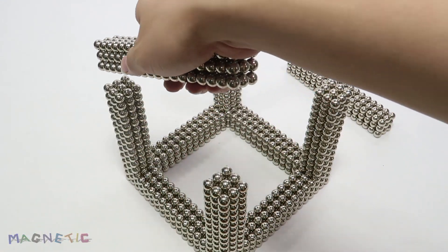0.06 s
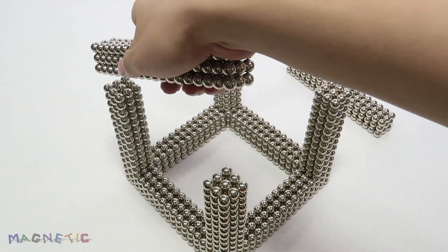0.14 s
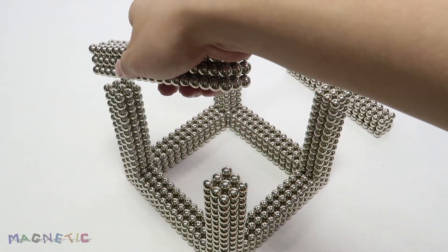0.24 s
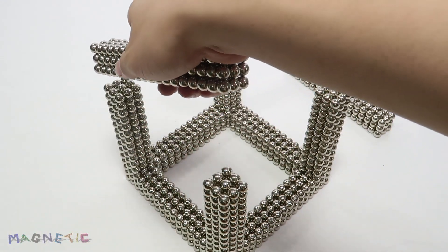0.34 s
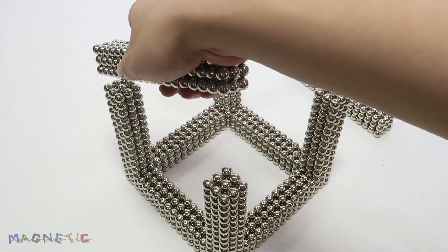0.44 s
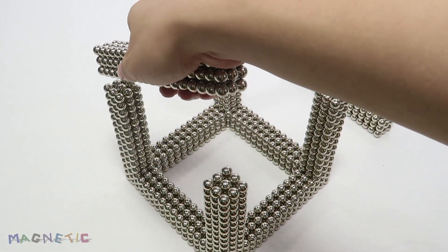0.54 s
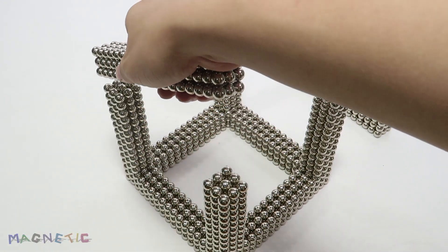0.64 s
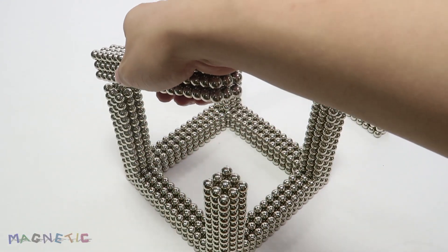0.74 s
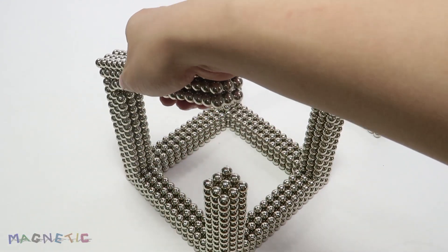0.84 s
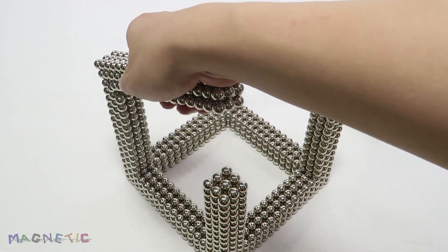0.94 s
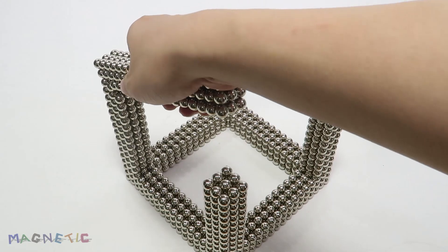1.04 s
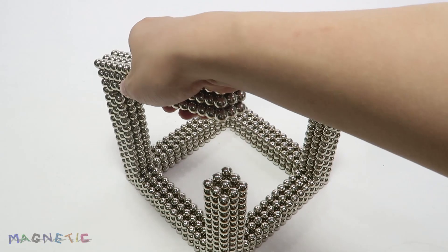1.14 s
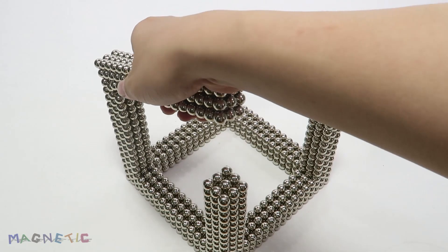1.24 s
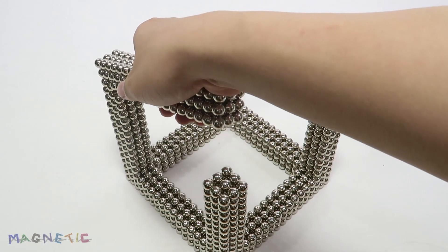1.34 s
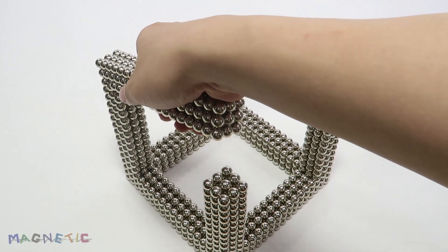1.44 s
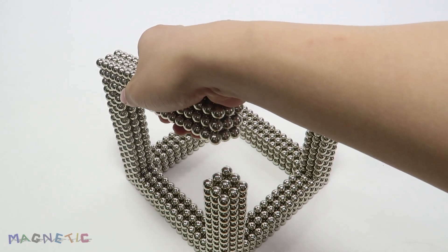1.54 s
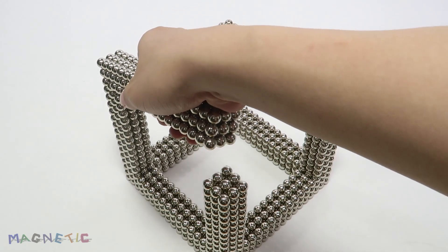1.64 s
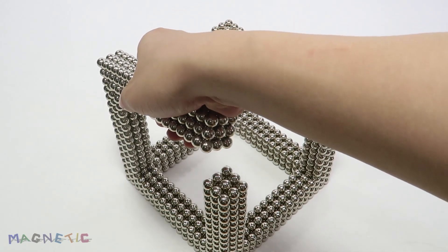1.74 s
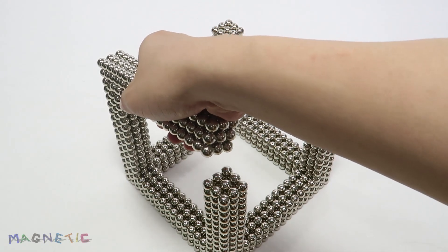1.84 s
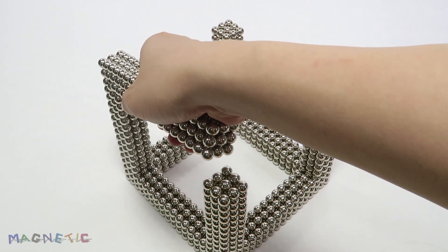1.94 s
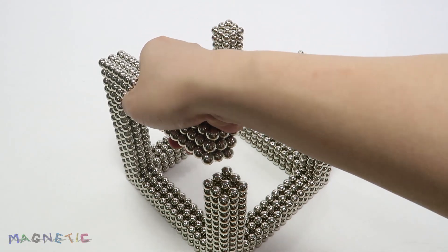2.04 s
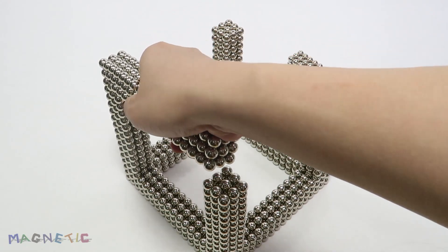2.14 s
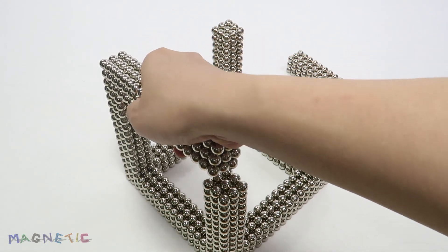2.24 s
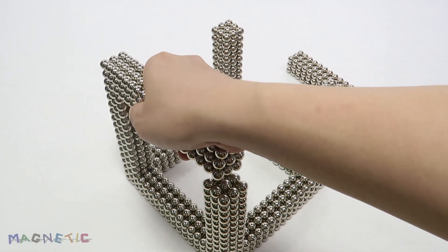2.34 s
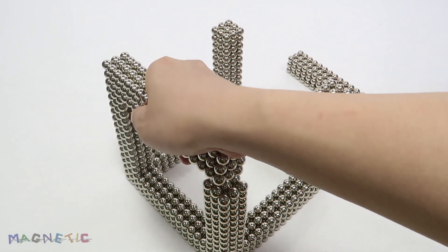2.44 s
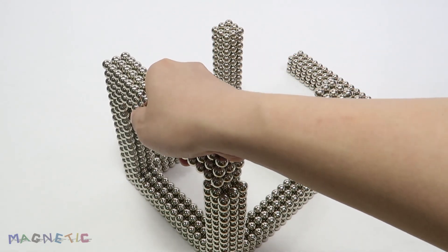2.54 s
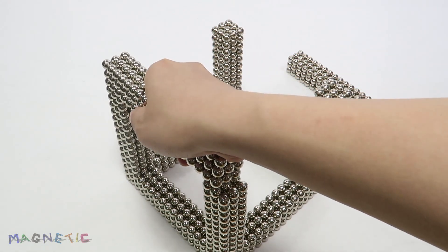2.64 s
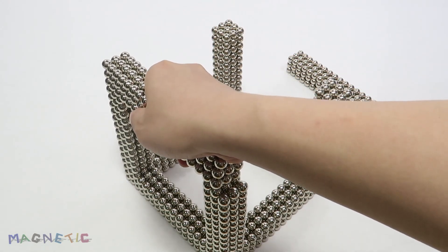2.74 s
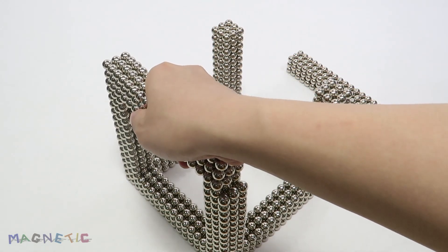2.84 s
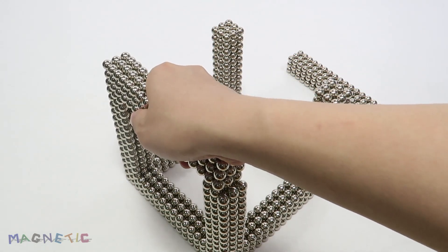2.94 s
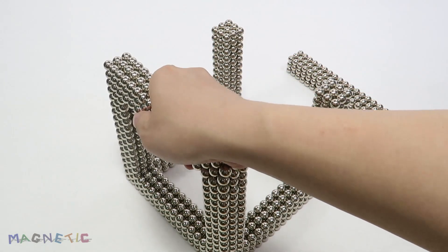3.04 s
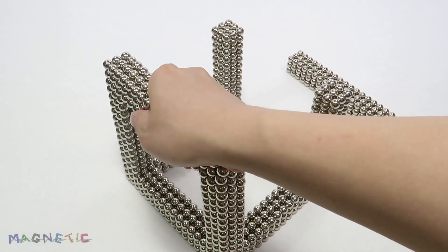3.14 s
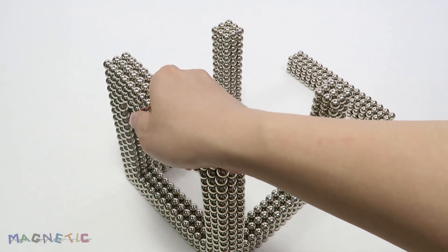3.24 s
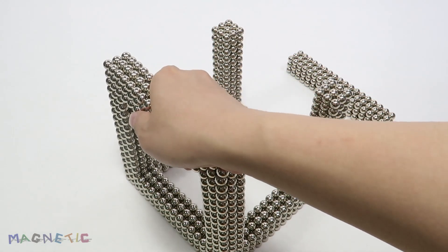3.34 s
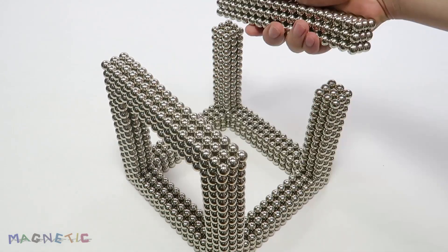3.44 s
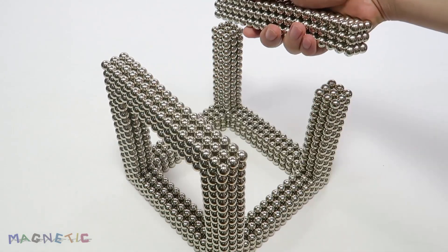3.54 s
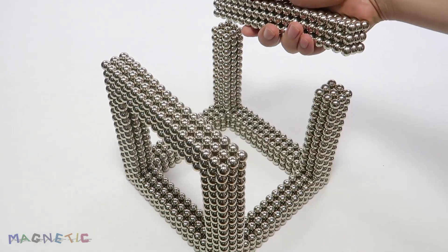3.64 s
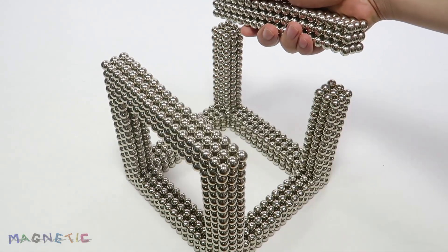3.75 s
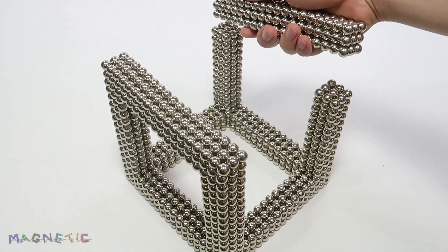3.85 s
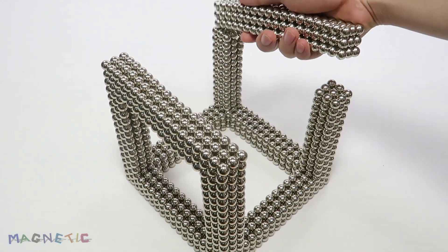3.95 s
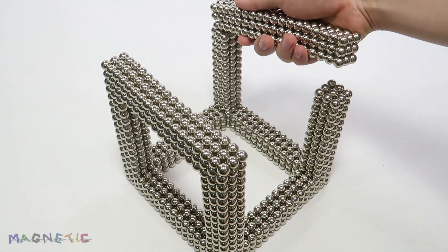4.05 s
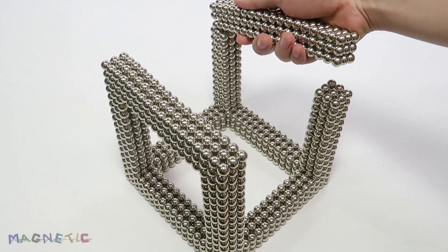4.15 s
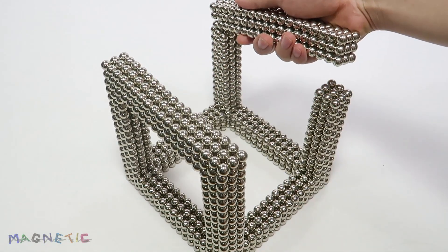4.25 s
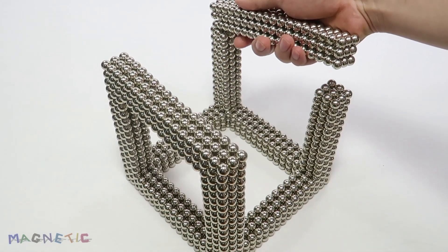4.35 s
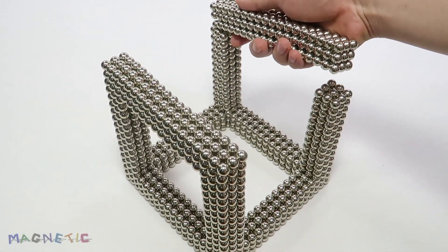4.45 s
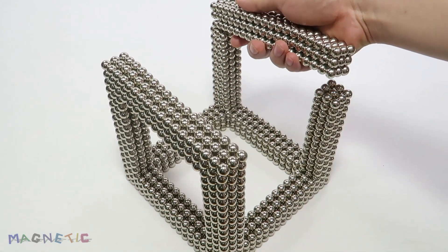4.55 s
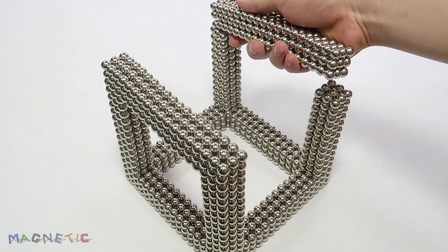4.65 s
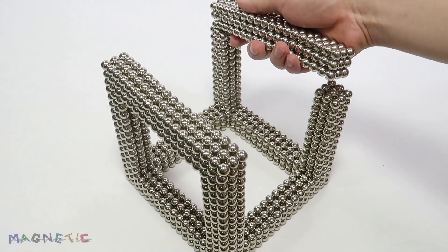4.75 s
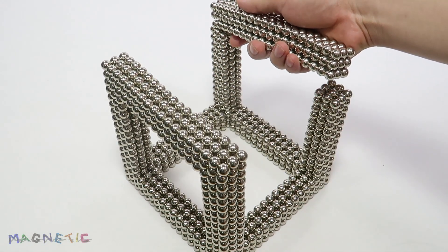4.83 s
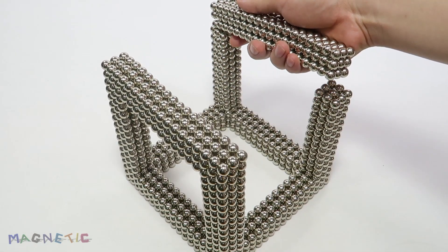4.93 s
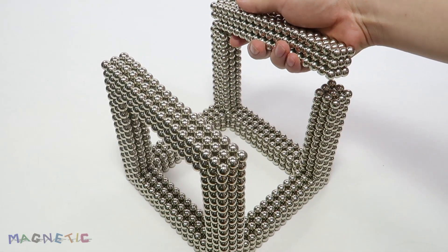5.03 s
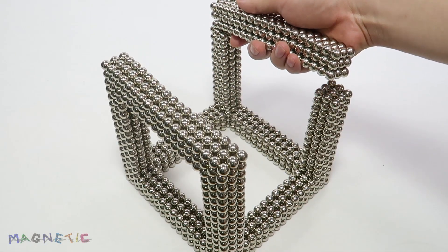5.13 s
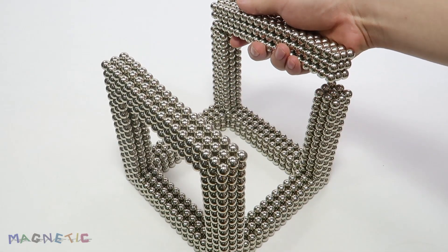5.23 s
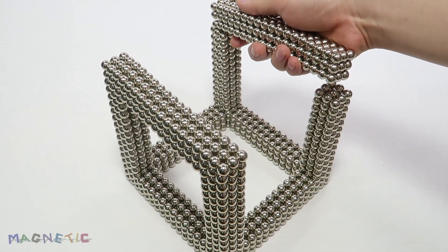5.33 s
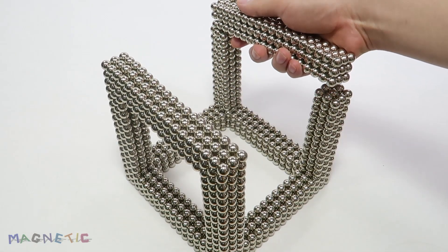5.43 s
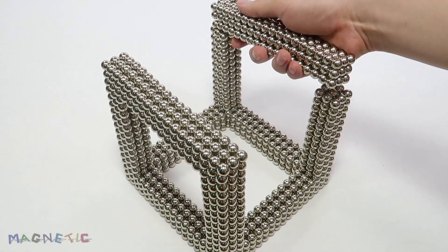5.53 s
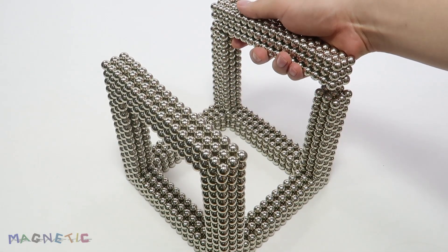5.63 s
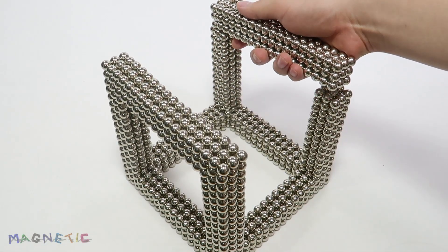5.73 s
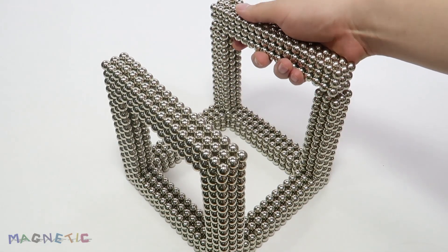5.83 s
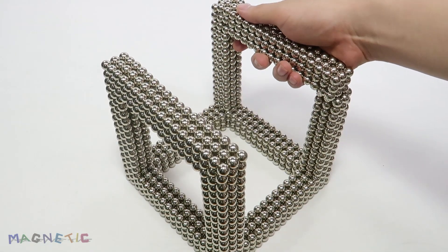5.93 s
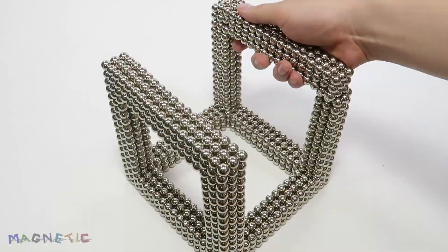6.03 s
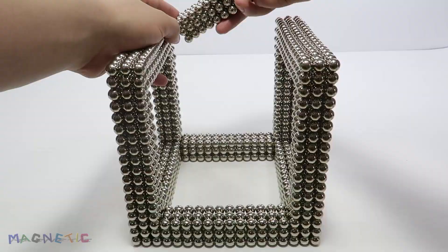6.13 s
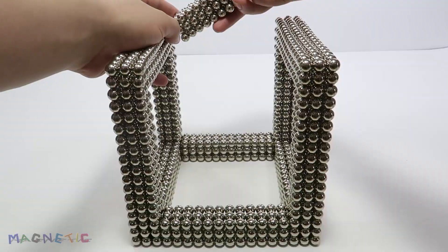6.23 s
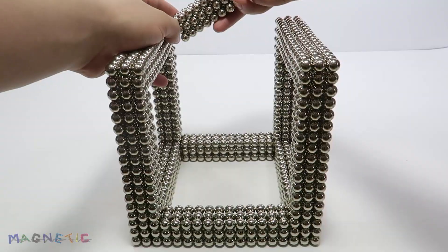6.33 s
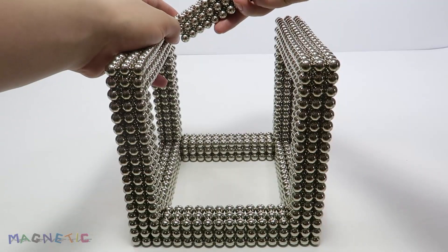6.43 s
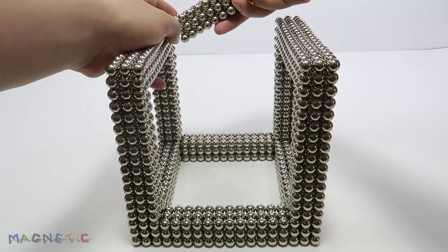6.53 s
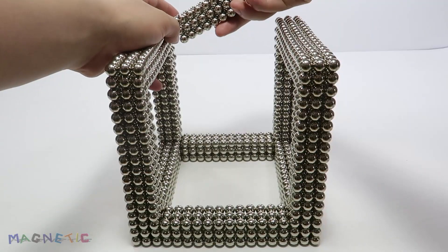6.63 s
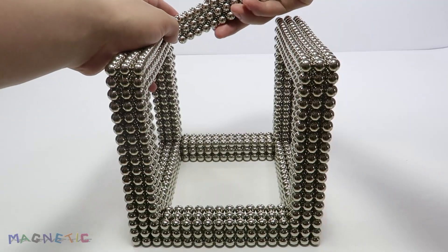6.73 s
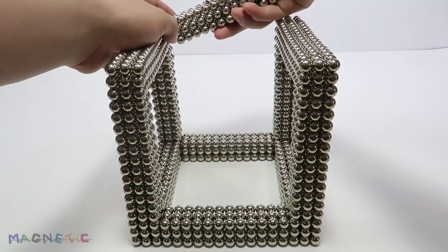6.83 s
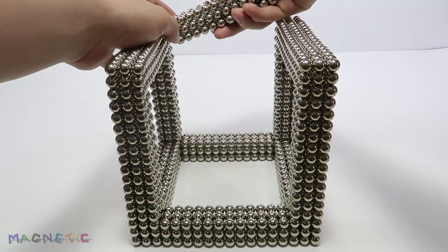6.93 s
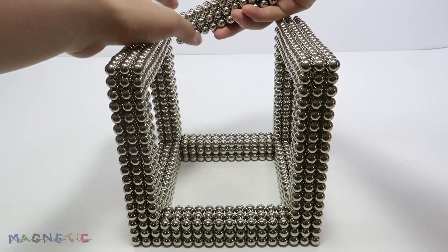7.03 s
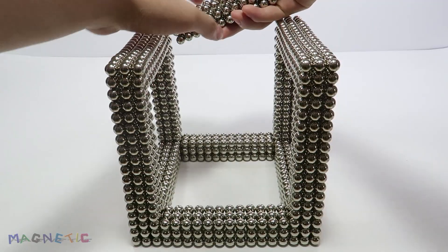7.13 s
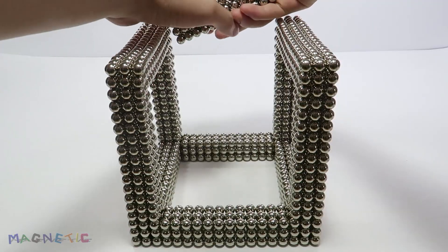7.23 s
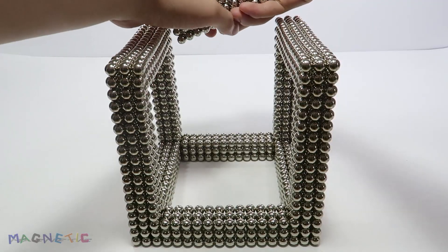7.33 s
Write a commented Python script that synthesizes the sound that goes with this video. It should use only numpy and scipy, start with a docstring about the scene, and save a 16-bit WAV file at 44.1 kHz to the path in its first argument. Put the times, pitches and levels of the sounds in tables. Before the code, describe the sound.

Very close to the microphone in a bare, ringing room, rails of small magnetic steel balls clack onto a frame. One hard double snap, then light ticks and another cluster, a burst of several snaps, later one more ragged burst, and two softer clicks over dull hiss. Near-silence lies between, with faint hand nudges.

```python
"""Faint wavering low drones and a few dull nudges come first, then rows of magnetic balls snap onto a cube frame.
Each joint zips shut in one to five snaps of differing strength and colour, close to the microphone in a bare,
ringing room; each snap is a shaped noise burst.
A landing rail is a swaying tone, a knock of frame resonances and a slow shake of the desk.
Three shots are cut together, the last with open hiss; the loudest snaps overload the microphone."""
import sys
import numpy as np
from scipy import signal
from scipy.fft import rfft, irfft, next_fast_len
from scipy.io import wavfile

SR = 44100
rng = np.random.default_rng(int(sys.argv[2]) if len(sys.argv) > 2 else 0)


def persist_wave(psi):
    """Save psi, clipped to +-1, as 16-bit WAV."""
    counts = np.round(np.clip(psi, -1, 1) * 32767).astype(np.int16)
    wavfile.write(sys.argv[1], SR, np.atleast_2d(counts).T)


N = 325492

# Faint low drones in narrow bands: f/Hz, width/Hz, level/dB before the swell
DRONES = [(114, 19, -79.5), (155, 21, -75), (195, 79, -74.5), (288, 35, -81), (350, 13, -89.5),
          (446, 39, -83), (683, 45, -92), (1060, 70, -94.5), (1470, 90, -96.5)]
# Faint steady air noise, relative spectrum: f/Hz, density/dB per Hz
AIR_SPECTRUM = [(25, -18.5), (90, -1), (300, -3), (700, -16.5), (2500, -23.5), (4500, -26.5), (7500, -17.5),
                (12000, -11), (16000, -30)]
AIR_DB = -83.5
# Open hiss of the last shot, relative spectrum: f/Hz, density/dB per Hz
HISS_SPECTRUM = [(15, -50), (25, -9), (91, -11), (152, 2), (204, -11), (289, -2), (349, -14.5), (469, -10),
                 (684, -16.5), (762, -19), (5730, -37.5), (11800, -50), (15500, -60)]
HISS_DB = -44
# A rail that sings on faintly after landing: t/s, f/Hz, level/dB before it wavers, t60/s
SINGING_RAIL = (4.159, 2191, -43.5, 1.15)
# Final rate of decay of the room's ring: f/Hz, t60/s
ROOM_T60 = [(60, 1.15), (300, 0.6364), (1200, 0.6582), (5000, 0.6283), (9000, 0.5), (15000, 0.1659)]
# Colour of the room's ring: f/Hz, level/dB
ROOM_COLOUR = [(40, 0.5), (150, 4.5), (400, 6), (1200, 9), (3000, 2.5), (6500, 0), (11000, -2.5),
               (16000, -2)]
# Slow modes of the desk: f/Hz, relative level/dB, t60/s of the final decay
DESK_MODES = [(30, 1, 0.78), (85, -12.5, 0.13)]
# Resonances of the frame: f/Hz, width/Hz, relative level/dB
FRAME_MODES = [(300, 88, 4), (403, 93, 5.5), (548, 67, -6.5), (619.7, 24, -1.5), (818, 46, 0.5),
               (974, 55, -1), (1010, 94, -7), (1220, 65, -10.5), (1504, 120, -7), (1840, 50, 1.5)]
# Nudges by the hand, a sway with hardly a knock: t/s, sway f/Hz, sway level/dB
NUDGES = [(.03, 154, -27.5), (.195, 135, -31.5), (.485, 120, -38.5), (2.06, 145, -34.5), (5.415, 221, -26),
          (5.56, 135, -32.5)]
# Rails landing on the frame: t/s, sway f/Hz, share by which the sway starts higher, sway level/dB,
# knock centre f/Hz, knock level/dB, room level/dB against the blow
THUDS = [(1.0305, 65.7, 0.087, 8.5, 760, 9, -6.5), (1.036, 253, 0.13, -8, 318, 1.5, -1.5),
         (2.61, 153, 0.038, -5.5, 760, -24.5, -7), (2.647, 85, 0.11, -5, 473, -23.5, -7.5),
         (3.192, 151, 0.15, 0, 522.4, 7.5, -1.5), (3.195, 72, 0.094, 0.5, 1030, 4, -3),
         (3.442, 123, 0.24, -1, 468, -12, -4), (4.054, 144, 0.07, -16.5, 569, -24.5, 5),
         (4.131, 72.6, 0.092, -7, 1180, 2.5, -4), (4.159, 104.8, .1, 9, 1008, -5, -13.5),
         (5.876, 121, 0.16, 2.5, 800, -25.5, -14.5), (5.879, 220, 0.14, -7.5, 1800, -16, -9.5),
         (6.041, 71.6, 0.84, 2.5, 810, -3.5, -2), (6.27, 191, 0.08, -11, 358, -12, -6.5),
         (6.474, 150.7, 0.074, -8, 336, -19, -1.5)]
# Click of steel on steel: f/Hz, relative level/dB
CLICK = [(100, -9), (450, -18.5), (600, -17), (800, -18.5), (1130, -20.5), (1400, -15.5), (1800, -15),
         (2300, -17.5), (2830, -14.5), (3150, -10), (3850, -9), (4500, -2.5), (5200, -2), (6400, -1),
         (7700, -2), (10500, 1.5), (12500, -0.5), (16000, -5)]
# Dips in the spectrum of the snaps, deepest in the light ones: f/Hz, width/Hz, share of the snap's dip depth
DIPS = [(342, 60, .35), (610, 41, 0.45), (1110, 120, 0.88), (2136, 140, 1.3), (2583, 160, 1.25),
        (3850, 150, 0.27)]
# Rows of balls snapping home: t/s, level/dB, run of contacts/ms, ring f/Hz, ring level/dB, body level/dB,
# dip depth/dB (none from 0 up), treble tilt/dB per octave, room level/dB against the snap
SNAPS = [(1.0285, 26.5, 1.1, 6250, 8, 1.5, -8, -1, -11),
         (1.032, 21, 1.36, 6460, 8.5, -6.5, -6, -1.5, -10.5), (1.0342, 26, 3.5, 10030, 3, -4, -2, 0.5, -7),
         (2.595, -4, .3, 6280, 4, 9.5, -30, -4.5, 2), (2.6089, 0, 0.82, 3290, 12.5, 1.5, -25, -0.5, 0.5),
         (2.6125, -2.5, 2, 6120, 4, 1.5, -24, 4.5, 3), (2.646, 14, 0.96, 6430, 15.5, 2.5, -27, 0.5, -12),
         (3.1697, 15, 1.9, 12100, 1.5, -2, -1, -2.5, -6), (3.1895, 21.5, 2.8, 11180, 4.5, -11, -3, 2, -7),
         (3.1924, 20, 2.16, 4375, 2, -4, 0, 0, -7), (3.1953, 19.5, 3.5, 1900, 4.5, -2, -5, 1.5, -6.5),
         (3.4408, 6, 3, 1860, 16.5, 4.5, -14, -1.5, -11.5),
         (3.4427, 3.5, 1.8, 6130, 4, 9, -11.5, -7.5, -13),
         (4.0499, 6.5, 0.51, 10300, 5.5, -14.5, -17, 4, -14.5),
         (4.052, -2.5, 0.6, 6450, 9, -9, -18, 1.5, -6.5), (4.1299, 21, 3.46, 4570, 0, 3, -2, 3.5, -2.5),
         (4.1491, 18, 2.7, 3016, 11, 6.5, -9, 1.5, -4), (4.1582, 22, 2.1, 12600, 10, 3, -8.5, 4, -7),
         (4.1687, 20, 3.2, 4540, 7.5, 6, -8, 0, -11), (5.8743, 16.5, 0.87, 3270, 10.5, -0.5, -27.5, 2, -14),
         (6.0401, 18, 1.8, 4490, 4.5, 1.5, -11.5, 0.5, -18), (6.0495, 21.5, 4.6, 6200, 5, -2, -17, 3, -8.5),
         (6.0579, 12.5, 1.3, 11100, 10.5, 3, -6, 0, -8.5),
         (6.0633, 17.5, 0.55, 8500, 4, 5.5, -0.5, 2.5, -6),
         (6.0669, 6.5, 0.51, 6180, 2.5, -5.5, 4, -3, -4.5), (6.2705, 8.5, 1.25, 5000, 5, 6.5, 3, 0, -10),
         (6.2896, -5, 1.4, 4060, 9, 12, -12, -4, -22), (6.4744, 8.5, 1.5, 3850, 6.5, 7.5, 6, -2, -11.5)]
# Shots, each with its own rail: end t/s, high ring f/Hz, desk level/dB against the sway,
# level/dB to which the shot's ring is turned down after the cut
SHOTS = [(3.504, 11490, -31.5, -8), (6.201, 11170, -54.5, -36), (7.4, 12500, -56, 0)]

ROOM_SIZE = 65536  # samples of room ring
AFTERHISS_DB, AFTERHISS_GROWTH = -55, 0.16  # dB at a 0 dB snap, and dB gained per dB of snap
NUDGE_STIFFEN = .1  # share by which a nudged sway starts higher
NUDGE_KNOCK_HZ, NUDGE_KNOCK_DB = 390, -23  # the knock is relative to the sway
DESK_FOLLOWS_HZ = 70.6  # faster sways shake the desk less, slower ones more
CLIP_DB = -0.77  # level at which the microphone overloads
LOW_CUT_HZ, TOP_HZ = 12, 15800


def undb(db):
    """Decibels to gain."""
    return 10 ** (np.asarray(db) / 20)


def unit(x):
    """Scale to unit energy per channel, averaged over the channels."""
    return x / np.sqrt(np.sum(np.atleast_2d(x) ** 2, axis=1).mean())


def along(points, hz):
    """Read (Hz, value) points on a log-frequency axis."""
    f, value = np.transpose(points)
    return np.interp(np.log(hz + 1), np.log(f), value)


def bins(size):
    """Frequencies of a spectrum of this many samples."""
    return np.arange(size // 2 + 1) * SR / size


def tint(x, db):
    """Minimum-phase filter with the given gain in each bin, so the colour follows the attack."""
    size = x.shape[-1]
    cepstrum = irfft(np.log(undb(db)), size)
    # folding the cepstrum forward makes the filter causal
    cepstrum[1:size // 2] *= 2
    cepstrum[size // 2 + 1:] = 0
    return irfft(rfft(x) * np.exp(rfft(cepstrum)), size)


def stereo(mid, side, width):
    """Left and right from mid and side."""
    return np.array([mid + width * side, mid - width * side]) / np.hypot(1, width)


def stereo_noise(size, width):
    """White noise spread between left and right."""
    return stereo(*rng.standard_normal((2, size)), width)


def add(track, s, sound):
    """Mix a sound in at time s."""
    start = int(s * SR)
    track[:, start:start + sound.shape[1]] += sound[:, :N - start]


def die_away(age, t60):
    """Exponential decay that loses 60 dB in t60 seconds."""
    return np.exp(-np.log(1000) * age / t60)


def lingering(t, linger_s):
    """Age that starts slowly, so that a decay lingers before it falls."""
    return np.hypot(t, linger_s) - linger_s


def waver(rate=11):
    """Random levels, `rate` a second, joined by straight lines; spread near 1."""
    t = np.arange(N) / SR
    return 1.2 * np.interp(t * rate, np.arange(256), rng.standard_normal(256))


def drones(swell_db=7, wander=0.018):
    """Faint low drones: narrow bands of noise, each swelling, fading and wandering in pitch on its own."""
    size, out = next_fast_len(N, True), 0
    noise = rfft(stereo_noise(size, width=0.72))
    for hz, width_hz, db in DRONES:
        band = irfft(noise * np.exp(-2 * ((bins(size) - hz) / width_hz) ** 2), size)
        # an uneven reading speed bends the pitch
        place = np.cumsum(1 + wander * waver(rate=5.4))
        band = np.array([np.interp(place, np.arange(size), side) for side in band])
        out = out + unit(band) * np.sqrt(N) * undb(db + swell_db * waver(rate=16))
    return out


def air(spectrum, db, width):
    """Steady background noise, shaped by a spectrum and set to an RMS level."""
    size = next_fast_len(N, True)
    shaped = rfft(stereo_noise(size, width)) * undb(along(spectrum, bins(size)))
    noise = irfft(shaped, size)[:, :N]
    return unit(noise) * np.sqrt(N) * undb(db)


def afterhiss(above_hz=4800, t60=4.8, end_s=0.87, order=2):
    """A faint, even hiss outlasts the ring of the latest snap, then stops."""
    t, level = np.arange(N) / SR, np.zeros(N)
    for s, snap_db, *_ in SNAPS:
        age = np.maximum(t - s, 0)
        start_gain = undb(AFTERHISS_DB + AFTERHISS_GROWTH * snap_db)
        stop = np.exp(-(age / end_s) ** 10)
        # the strongest hiss hides the others
        level = np.maximum(level, (t >= s) * start_gain * die_away(age, t60) * stop)
    treble = signal.butter(order, above_hz, "high", fs=SR, output="sos")
    hiss = signal.sosfilt(treble, stereo_noise(N, width=0.49))
    return level * signal.sosfilt(treble, hiss)


def singing_rail(waver_db=3):
    """One thin tone that wavers in level and phase as it fades."""
    s, hz, db, t60 = SINGING_RAIL
    age = np.maximum(np.arange(N) / SR - s, 0)
    level = (age > 0) * undb(db + waver_db * waver(rate=7.7))
    tone = np.sin(2 * np.pi * hz * age + waver())
    return level * tone * die_away(age, t60)


def room_modes(hz, spread_db=5, spacing_hz=28, merge_hz=8000):
    """Gain per bin of the room's own modes: separate lines low down, merging higher up."""
    peaks = np.interp(hz / spacing_hz, np.arange(2048), rng.uniform(-1.7, 1.1, 2048))
    return spread_db * peaks / np.hypot(1, hz / merge_hz)


def room(build_s=0.00077, linger_s=0.16, bands=10):
    """Diffuse field of bare walls in bands, and how each dies away: it lingers, then falls."""
    size = 2 * ROOM_SIZE
    t, hz = np.arange(ROOM_SIZE) / SR, bins(size)
    noise = rfft(stereo_noise(size, width=0.55)) * undb(along(ROOM_COLOUR, hz) + room_modes(hz))
    centres = np.geomspace(100, 15000, bands)
    # each band fades linearly into its neighbours
    field = np.array([irfft(noise * along(np.c_[centres, share], hz), size) for share in np.eye(bands)])
    fall = die_away(lingering(t, linger_s), along(ROOM_T60, centres)[:, None])
    return field, fall * (1 - np.exp(-t / build_s))


def echoes(walls):
    """Every blow meets its own pattern of reflections: a random stretch of the diffuse field."""
    field, decay = walls
    start = rng.integers(ROOM_SIZE)
    return unit(np.einsum("bct,bt->ct", field[:, :, start:start + ROOM_SIZE], decay))


def in_room(blow, walls, wet_db=-6):
    """A dull blow together with its reflections."""
    out = undb(wet_db) * signal.fftconvolve(blow, echoes(walls), axes=1)
    add(out, 0, blow)
    return out


def wobble(left_db=-5, linger_s=0.4, left_lead_rad=0.7):
    """The desk keeps shaking in its slow modes under the frame, more on the right."""
    t = np.arange(3 * SR // 2) / SR
    age = lingering(t, linger_s)
    phase = np.array([[left_lead_rad], [0]])
    shake = 0
    for hz, db, t60 in DESK_MODES:
        shake = shake + undb(db) * np.sin(2 * np.pi * hz * t + phase) * die_away(age, t60)
    build = 1 - np.exp(-t / 0.048)
    return undb([[left_db], [0]]) * shake * build


def thud(sway_hz, stiffen, sway_db, knock_hz, knock_db, sway_t60=0.14, reach_octaves=0.35, push_s=0.0011):
    """The heavy rail sways on its post, stiffer at first; the blow wakes frame resonances near the knock."""
    t = np.arange(SR) / SR
    turns = np.cumsum(sway_hz * (1 + stiffen * np.exp(-t / 0.0086))) / SR
    build = 1 - np.exp(-turns / .5)
    sway = unit(np.sin(2 * np.pi * turns) * die_away(t, sway_t60) * build)
    knock = np.zeros((2, SR))
    for hz, width_hz, db in FRAME_MODES:
        near = np.exp(-.5 * (np.log2(hz / knock_hz) / reach_octaves) ** 2)
        # the phase differs between left and right
        phase = rng.uniform(0, 2 * np.pi) + .7 * rng.standard_normal((2, 1))
        life = t[t < np.pi / width_hz]
        mode = np.sin(2 * np.pi * hz * life + phase) * np.exp(-np.pi * width_hz * life)
        knock[:, :len(life)] += near * undb(db) * unit(mode)
    push = 1 - np.exp(-t / push_s)
    return undb(sway_db) * sway + undb(knock_db) * unit(knock * push)


def colour(size, body_db, tilt_db, tilt_from_hz=6000, body_ripple_db=7, treble_ripple_db=6, ripple_hz=150):
    """Gain per bin of one snap: the steel click, its body, its treble tilt and its many weak modes."""
    hz = bins(size)
    modes = np.interp(hz / ripple_hz, np.arange(1024), np.minimum(rng.uniform(-1, 1, 1024), .4))
    body = 1 / (1 + (hz / 3700) ** 8)  # hands over to the treble at 3700 Hz
    tilt = tilt_db * np.log2(np.maximum(hz / tilt_from_hz, 1))
    body_part = body * (body_db + body_ripple_db * modes)
    treble_part = (1 - body) * treble_ripple_db * modes
    return along(CLICK, hz) + tilt + body_part + treble_part


def rings(ring_hz, ring_db, high_hz, ring_octaves=0.065, high_db=0.5, high_octaves=0.074):
    """Gain per bin of two short rings: that of the snapping row, and the high one of its rail."""
    hz = bins(ROOM_SIZE) + 1
    peak = lambda centre, octaves: np.exp(-.5 * (np.log2(hz / centre) / octaves) ** 2)
    return ring_db * peak(ring_hz, ring_octaves) + high_db * peak(high_hz, high_octaves)


def dips(depth_db):
    """Gain per bin of the dips in the spectrum of a snap."""
    hz = bins(ROOM_SIZE)
    shape = sum(share * np.exp(-np.square((hz - centre) / width_hz)) for centre, width_hz, share in DIPS)
    return min(depth_db, 0) * shape


def snap(run_ms, gains_db, settle_ms=0.56, chatter_db=-16, chatter_ms=13.0, grain=0.6, size=4096):
    """Ball after ball makes contact as an uneven noise burst, then the row chatters to rest."""
    ms = np.arange(size) / SR * 10 ** 3
    run = np.exp(-np.maximum(ms - run_ms, 0) / settle_ms)
    chatter = undb(chatter_db) * np.exp(-ms / chatter_ms)
    uneven = np.exp(grain * np.repeat(rng.standard_normal(size // 8), 8))  # steps of 8 samples
    contacts = stereo_noise(size, width=0.66) * uneven * (run + chatter)
    return unit(tint(contacts, gains_db[::ROOM_SIZE // size]))


def shot(start, end, walls, high_hz, desk_db, ring_share=0.64, dip_share=1.0):
    """All snaps, landings and nudges between two cuts, with the room's ring."""
    out, shake = np.zeros((2, N)), wobble()
    within = lambda table: [row for row in table if start <= row[0] < end]
    for s, sway_hz, db in within(NUDGES):
        nudge = thud(sway_hz, NUDGE_STIFFEN, db, NUDGE_KNOCK_HZ, db + NUDGE_KNOCK_DB)
        add(out, s, in_room(nudge, walls))
    for s, sway_hz, stiffen, sway_db, knock_hz, knock_db, wet_db in within(THUDS):
        landing = thud(sway_hz, stiffen, sway_db, knock_hz, knock_db)
        add(out, s, in_room(landing, walls, wet_db))
        add(out, s, undb(sway_db + desk_db) * (DESK_FOLLOWS_HZ / sway_hz) ** 2 * shake)
    for s, db, run_ms, ring_hz, ring_db, body_db, depth_db, tilt_db, wet_db in within(SNAPS):
        steel_db, dip_db = colour(ROOM_SIZE, body_db, tilt_db), dips(depth_db)
        rings_db = rings(ring_hz, ring_db, high_hz)
        add(out, s, undb(db) * snap(run_ms, steel_db + rings_db + dip_share * dip_db))
        # the room repeats each snap's colour, with its rings less marked
        reply = tint(echoes(walls), steel_db + ring_share * rings_db + dip_db)
        add(out, s, undb(db + wet_db) * unit(reply))
    return out


def scene():
    """Three shots in a row; each cut chops the ring of the one before, and the last one hisses."""
    t, walls = np.arange(N) / SR, room()
    quiet = drones() + air(AIR_SPECTRUM, AIR_DB, width=1.0) + afterhiss() + singing_rail()
    hiss = air(HISS_SPECTRUM, HISS_DB, width=0.54)
    out, start = np.where(t < SHOTS[-2][0], quiet, hiss), 0
    for end, high_hz, desk_db, drop_db in SHOTS:
        out = out + shot(start, end, walls, high_hz, desk_db) * undb(drop_db * (t > end))
        start = end
    return out


def record(dry):
    """The microphone clips on the hardest snaps; the very bottom and the top are cut."""
    limit = undb(CLIP_DB)
    clipped = np.clip(dry, -limit, limit)
    low_cut = signal.butter(1, LOW_CUT_HZ, "high", fs=SR, output="sos")
    top_cut = signal.ellip(10, .1, 70, TOP_HZ, fs=SR, output="sos")
    return signal.sosfilt(top_cut, signal.sosfilt(low_cut, clipped))


dry = scene()
out = record(dry)
persist_wave(out)
```